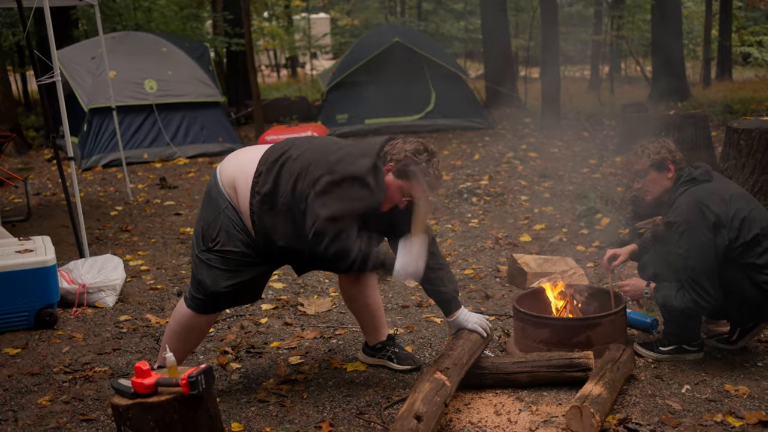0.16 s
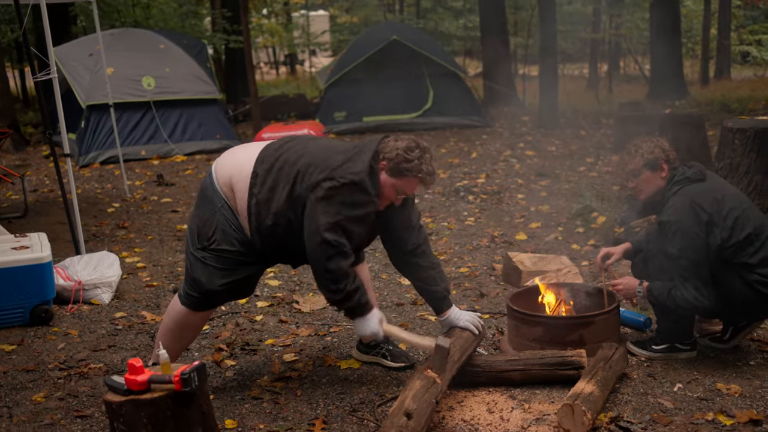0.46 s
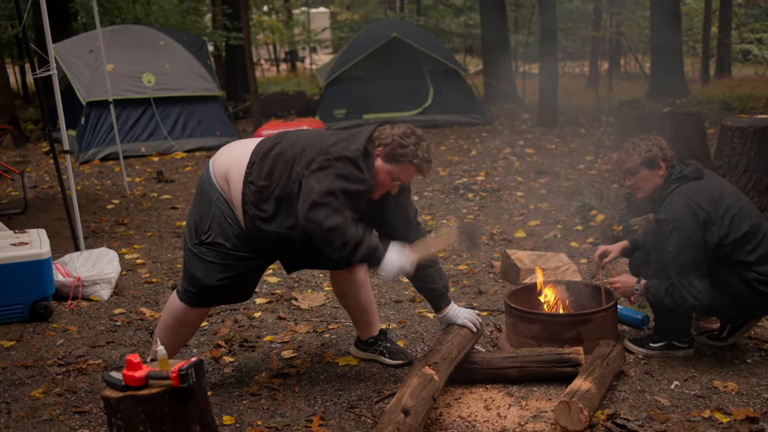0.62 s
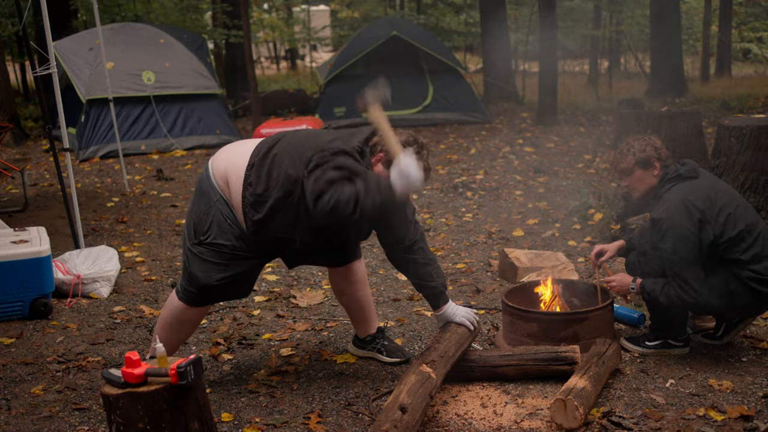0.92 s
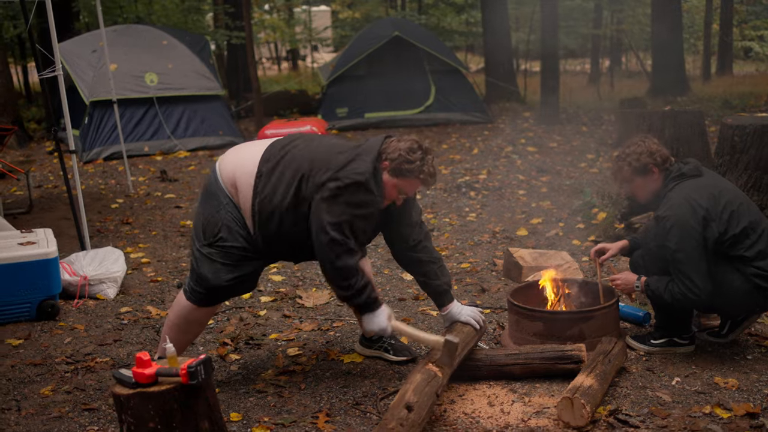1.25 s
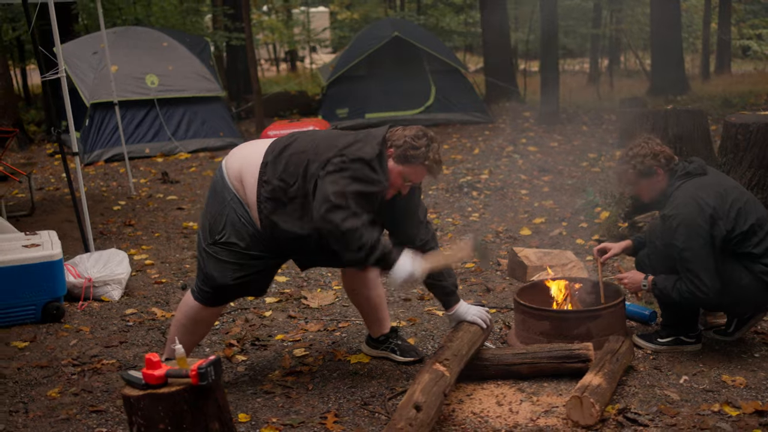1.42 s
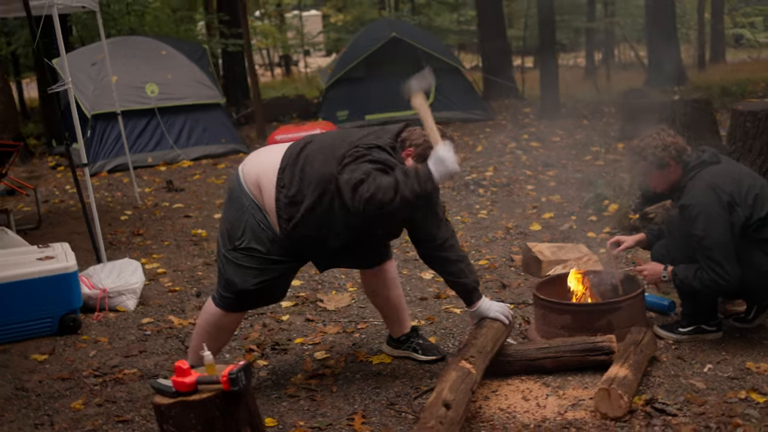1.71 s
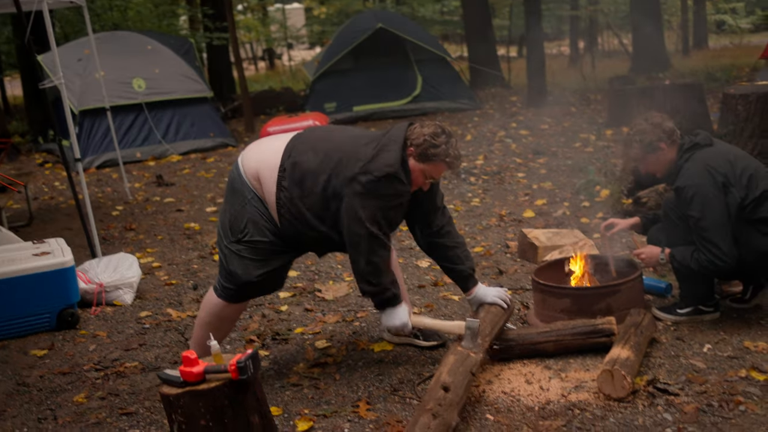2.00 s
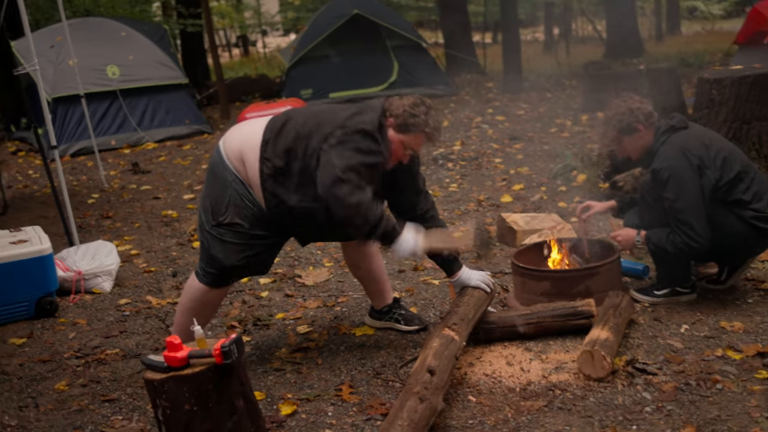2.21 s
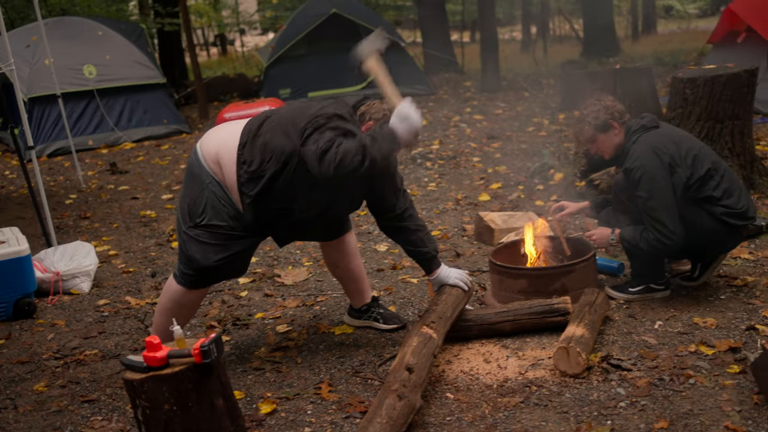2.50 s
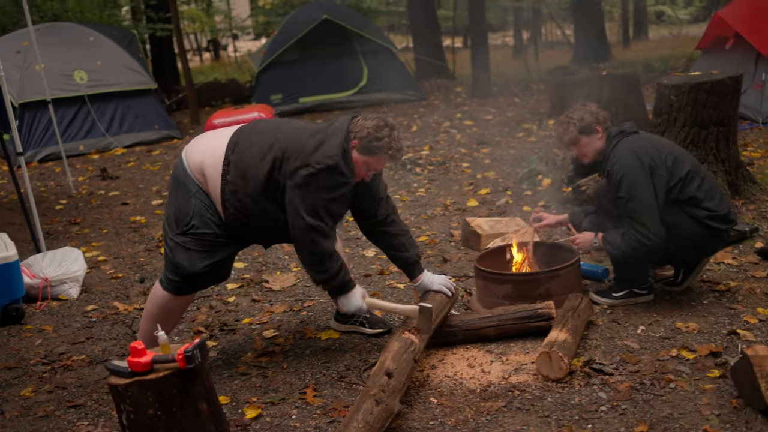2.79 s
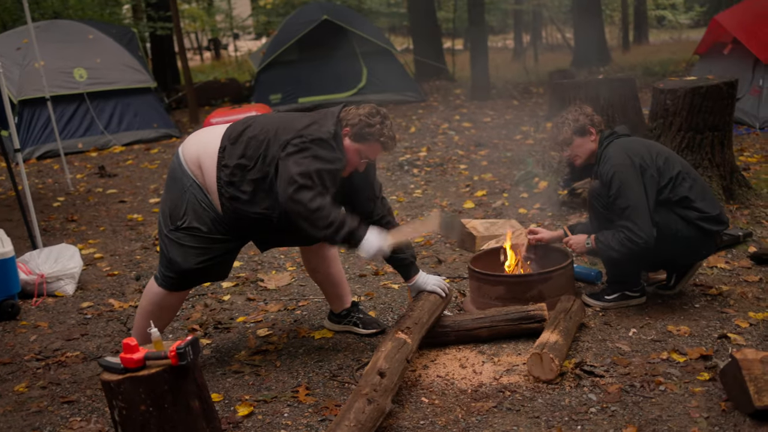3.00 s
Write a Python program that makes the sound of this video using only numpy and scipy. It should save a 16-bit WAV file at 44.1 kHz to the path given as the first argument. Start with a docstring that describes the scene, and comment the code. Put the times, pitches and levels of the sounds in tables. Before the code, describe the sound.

Four loud hatchet strikes bite into a log at a forest campsite, close enough to overload the microphone. Each woody crack leaves a short echo, with faint fire crackle, light scuffs and a low rumble in the gaps.

```python
"""At a forest campsite a hatchet chops four times into a log that lies on the ground.
Each impact gives a crack of fibres, a squeak of wedging steel, a hollow knock from the log's damped
modes and a thud. The trees scatter the sound back, and the close blows overload the microphone.
Between blows the wood scuffs and a campfire ticks over a low rumble and a thin hiss."""
import sys
import numpy as np
from scipy import signal
from scipy.fft import rfft, irfft
from scipy.io import wavfile
from scipy.ndimage import uniform_filter1d

SR = 44100
rng = np.random.default_rng(int(sys.argv[2]) if len(sys.argv) > 2 else 0)


def pcm_store(signal):
    """Save signal as 16-bit PCM."""
    levels = np.round(np.clip(np.atleast_2d(signal), -1, 1) * 32767)
    wavfile.write(sys.argv[1], SR, levels.astype(np.int16).T)


N = 138915
TIME = np.arange(N) / SR


def from_db(db):
    """Amplitude ratio of a level in decibels."""
    return 10 ** (np.asarray(db) / 20)


def at_hz(points, hz):
    """Interpolation of a spectrum on a log-frequency axis."""
    f, value = np.transpose(points)
    return np.interp(np.log(hz + 1), np.log(f), value)


def noise(gain_at, size=N):
    """Spectral shaping: white noise weighted by a gain at each frequency; unit rms."""
    x = irfft(rfft(rng.standard_normal(size)) * gain_at(np.fft.rfftfreq(size, 1 / SR)), size)
    return x / (x.std() + 1e-12)


def coloured(points):
    """Coloured noise with a tabled spectrum; unit rms."""
    return noise(lambda f: from_db(at_hz(points, f)))


def burst(hz, octaves, decay_s, size=8192):
    """Exponential decay of a band of noise around one frequency."""
    band = noise(lambda f: np.exp(-.5 * (np.log2((f + 1) / hz) / octaves) ** 2), size)
    return band * np.exp(-TIME[:size] / decay_s)


def drift(hz, size=N):
    """Random fluctuation: low-passed noise of unit rms."""
    return noise(lambda f: 1 / (1 + (f / hz) ** 2), size)


def ring(t, hz, t60):
    """Damped oscillation: a sine that falls 60 dB in t60 seconds."""
    return np.sin(2 * np.pi * hz * t) * 1000 ** (-t / t60)


def rise(t, tau_s):
    """Exponential approach to full amplitude."""
    return 1 - np.exp(-t / tau_s)


def add(out, start_s, x):
    """Superposition of a sound from a given time on."""
    i = max(int(start_s * SR), 0)
    out[i:i + len(x)] += x[:max(N - i, 0)]


def minimum_phase(gain):
    """Minimum phase: the shortest causal click that has this magnitude spectrum."""
    cepstrum = irfft(np.log(gain + 1e-7))
    half = len(cepstrum) // 2
    cepstrum[1:half] *= 2
    cepstrum[half + 1:] = 0
    return irfft(np.exp(rfft(cepstrum)))


def snap(envelope):
    """Spectral whitening: a brief noise with a fairly even spectrum and unit energy."""
    x = rng.standard_normal(len(envelope)) * envelope
    for _ in range(3):
        x = irfft(np.exp(1j * np.angle(rfft(x)))) * envelope ** .25
    return x / np.linalg.norm(x)


def forest_air():
    """Broadband noise that flickers softly, with a thin narrow-band hiss."""
    # spectrum of the air: f/Hz, relative level/dB
    spectrum = [(76, -38.5), (130, -7.5), (315, -9), (394, -11.5), (532, -5.5), (638, -11.5), (917, -13),
                (1170, -9), (1400, -16), (2140, -18), (2510, -17), (4320, -20.5), (5290, -25),
                (7910, -27.5), (16000, -36.5)]
    air = from_db(-61 + 1.5 * drift(hz=6)) * coloured(spectrum)
    hiss = from_db(-68.5) * burst(hz=4280, octaves=.06, decay_s=np.inf, size=N)
    return air + hiss


def rumble():
    """Amplitude modulation: low-frequency noise slowly rises and falls."""
    # envelope of the rumble: t/s, relative level/dB
    envelope = [(0, -58), (.16, -42), (.30, -41.5), (.42, -36), (.46, -57), (.62, -67), (.72, -52),
                (.96, -45.5), (1.3, -41.5), (1.52, -55.5), (1.63, -39), (1.9, -49.5), (2.1, -45.5),
                (2.45, -50.5), (2.68, -52.5), (2.97, -40), (3.15, -58)]
    # its spectrum: f/Hz, relative level/dB
    spectrum = [(20, -9), (50, -1), (80, 2.5), (105, -6.5), (150, -14), (300, -21.5), (600, -57.5)]
    level_db = -7.5 + np.interp(TIME, *np.transpose(envelope)) + 1.2 * drift(hz=4.5)
    return from_db(level_db) * coloured(spectrum)


def fire():
    """Impulsive noise: a few clear ticks among many faint crackles at random times."""
    # ticks of the fire: t/s, level/dB, f/Hz
    ticks = [(.109, -54, 4000), (0.491, -45.5, 11000), (.529, -47.5, 11000), (.632, -53, 7000),
             (.937, -46, 4000), (1.234, -46.5, 12000), (1.457, -42.5, 2620), (2.114, -41, 9000),
             (2.473, -53.5, 4500), (2.551, -47.5, 2520), (2.617, -45, 3010), (2.937, -47, 6000),
             (3.059, -52, 9000)]
    tick_s, octaves, crackles_per_s = 0.0028, 0.67, 37
    out = np.zeros(N)
    for start_s, db, hz in ticks:
        add(out, start_s, from_db(db) * burst(hz, octaves, tick_s))
    for start_s, extra_db, octave in rng.random((200, 3)) * [200 / crackles_per_s, 14, 2.5]:
        if start_s < N / SR:
            crackle = burst(2000 * 2 ** octave, octaves, tick_s / 2, size=512)
            add(out, start_s, from_db(-69.5 + extra_db) * crackle)
    return out


def diffuse_echoes(bands):
    """Reverberant decay: one second of noise, each band dying at its own rate."""
    centres_hz, f = [row[0] for row in bands], np.fft.rfftfreq(SR, 1 / SR)
    white, out = rfft(rng.standard_normal(SR)) / np.sqrt(SR), 0
    for share, (_, db, t60) in zip(np.eye(len(bands)), bands):
        band = irfft(white * at_hz(list(zip(centres_hz, share)), f), SR)
        out = out + band * from_db(db - 60 * TIME[:SR] / t60)
    return out


def forest(x):
    """Scattering: near reflections, two smeared echoes and a long wash from the trunks."""
    # scatter from the trees: f/Hz, initial level/dB, T60/s
    trees = [(78.9, -10.5, 0.28), (250, -12, 0.23), (500, -11.5, 1), (1100, -11.5, 1.0), (2380, -5, 1),
             (3350, -3, 0.99), (3800, -5, 0.96), (4400, 0, 1.0), (4720, -5, 0.67), (7240, -2, 0.99),
             (10000, 1, .65), (15000, -2, 1)]
    # scatter from the ground and camp gear: f/Hz, initial level/dB, T60/s
    nearby = [(80, 3, 0.37), (244, 6, 0.19), (487, 1.5, 0.18), (1080, 5, .2), (2500, 2, 0.26),
              (6000, -2.5, .15), (15000, -0.5, .14)]
    # distinct echoes: delay t/s, level/dB, lower edge f/Hz, upper edge f/Hz
    echoes = [(0.043, -20.5, 401, 1263), (0.081, -19.5, 4500, 14000)]
    t, smear_s = TIME[:SR], .012
    response = diffuse_echoes(trees) * rise(t, 0.015) + diffuse_echoes(nearby) * rise(t, 0.0017)
    for delay_s, db, low_hz, high_hz in echoes:
        smear = rng.standard_normal(SR) * (t > delay_s) * np.exp(-abs(t - delay_s) / smear_s)
        band = signal.butter(2, [low_hz, high_hz], "band", fs=SR, output="sos")
        response += from_db(db) * signal.sosfilt(band, smear / np.linalg.norm(smear))
    return signal.fftconvolve(x, response)[:N]


def swell():
    """Noise under an envelope: a hiss swells just before the first blow."""
    # envelope of the hiss: t/s, level/dB
    envelope = [(.10, -85), (.19, -51.5), (.245, -39), (.29, -42.5), (.31, -61)]
    # its spectrum: f/Hz, relative level/dB
    spectrum = [(100, -6.5), (480, -9.5), (800, -21), (1250, -15), (2000, -26), (2700, -17.5), (7000, -35),
                (9300, -24), (11500, -31), (14000, -14), (16000, -20.5)]
    level_db = np.interp(TIME, *np.transpose(envelope), left=-np.inf, right=-np.inf)
    return from_db(level_db) * coloured(spectrum)


def chops(size=16384):
    """Impact excitation: the edge presses in, fibres crack, the log rings and thuds on the ground."""
    # blows: t/s, log ring gain/dB, log pitch ratio, low-mode gain/dB, knock f/Hz, knock level/dB,
    # upper knock level/dB, crack level/dB, splinters re crack/dB, squeak f/Hz, squeak bandwidth/Hz,
    # squeak level/dB, overtones re squeak/dB, thud level/dB, forest gain/dB
    blows = [(0.2930, 0, 1.0, 0, 1134, 1.5, -11, 10, -8.5, 4825, 1416, 21, -18, -15, 1.5),
             (1.1224, -4, 1, 9, 957, 5.5, -4, 8.5, -2, 4150, 1220, 8.5, -9.5, -14.5, -1.5),
             (1.949, -3.5, 1.07, -7, 1140, -9.5, -18, 9.5, -5.5, 4250, 950, 26, -0.5, -16, 2),
             (2.7396, -0.5, 1.01, 0, 1078, 4.5, -1.5, 10, -4.5, 4030, 1400, 17, -13, -15.5, -3)]
    out, t = np.zeros(N), TIME[:size]
    lead, press_s = SR // 100, 0.00082
    squeak_delay_s, thud_delay_s = 0.00072, 0.0044
    before = t[:lead] - t[lead]
    press = from_db(-4) * np.exp(before / press_s)
    for (start_s, log_db, pitch, low_db, knock_hz, knock_db, upper_db, crack_db, splinter_db,
         squeak_hz, width_hz, squeak_db, overtones_db, thud_db, forest_db) in blows:
        log = log_ring(t, log_db, pitch, low_db)
        body = (knock(t, knock_hz, knock_db, upper_db) + log) * rise(t, 0.00043)
        crack = from_db(crack_db) * fibre_crack(t, splinter_db)
        steel, overtones = from_db(squeak_db) * np.array(squeak(t, squeak_hz, width_hz, overtones_db))
        thud = from_db(thud_db) * ring(t, hz=77, t60=0.1) * rise(t, 0.031)
        radiated = all_directions([body, crack, from_db(0.5) * steel, from_db(-13) * overtones])
        add(out, start_s - lead / SR, press * np.sin(2 * np.pi * knock_hz * before))
        add(out, start_s, body + crack)
        add(out, start_s + squeak_delay_s, steel + overtones)
        add(out, start_s + thud_delay_s, thud)
        add(out, start_s, from_db(forest_db) * forest(radiated))
    return out


def log_ring(t, gain_db, pitch, low_db):
    """Free vibration: the log's normal modes, each excited to a partly random level."""
    # modes of the log: f/Hz, relative level/dB, T60/s
    modes = [(115, -32.5, .14), (206, -32, 0.098), (280, -24.5, 0.053), (346, -18, 0.065),
             (436.3, -8.5, .07), (491.4, -7, 0.059), (526, -13.5, 0.055), (598, -17.5, 0.099),
             (795, -14.5, .04), (955, -19, 0.033), (1226, -18, 0.081), (1750, -27, 0.024),
             (2550, -26.5, .015)]
    low_below_hz, spread_db = 400, 4
    out = 0
    for hz, db, t60 in modes:
        level_db = gain_db + db + low_db * (hz < low_below_hz) + spread_db * rng.normal()
        out = out + from_db(level_db) * ring(t, pitch * hz, t60)
    return out


def knock(t, hz, db, upper_db, t60=0.013):
    """Heavy damping: two inharmonic modes die fast enough to be heard as a hollow knock."""
    return from_db(db) * ring(t, hz, t60) + from_db(upper_db) * ring(t, 1.58 * hz, t60)


def fibre_crack(t, splinter_db):
    """Fracture: the fibres snap, then splinter in an uneven, dying crunch."""
    # spectrum of the crack: f/Hz, relative level/dB
    spectrum = [(150, -6), (700, 10), (1500, 9), (2300, 6), (3000, 4.5), (3800, 4.5), (5500, 0),
                (8000, -6.5), (12000, -11), (16000, -12)]
    snap_s, splinter_s, size = 0.00086, 0.0093, len(t)
    fracture = snap(np.exp(-t / snap_s))
    splinters = rng.standard_normal(size) * from_db(3 * drift(900, size)) * np.exp(-t / splinter_s)
    fracture += from_db(splinter_db) * splinters / np.linalg.norm(splinters)
    fibres = minimum_phase(from_db(at_hz(spectrum, np.fft.rfftfreq(size, 1 / SR))))
    return signal.fftconvolve(fracture, fibres)[:size]


def squeak(t, hz, width_hz, overtones_db, slip_s=0.00077):
    """Friction: steel slips through wood; returns a rough tone and, apart, its overtones."""
    # overtones of the squeak: frequency ratio, relative level/dB
    overtones = [(2.17, -4), (3.22, -5)]
    slip = snap(np.exp(-t / slip_s))

    def band(centre_hz):
        edges = [centre_hz - width_hz / 2, centre_hz + width_hz / 2]
        return signal.sosfilt(signal.butter(2, edges, "band", fs=SR, output="sos"), slip)
    return band(hz), sum(from_db(overtones_db + db) * band(ratio * hz) for ratio, db in overtones)


def all_directions(parts, smear_octaves=.22):
    """Incoherent summation: a blow as the trees receive it, its fine peaks and notches averaged out."""
    f = np.fft.rfftfreq(len(parts[0]), 1 / SR)
    grid = np.geomspace(20, SR / 2, 4000)
    width = int(smear_octaves / np.log2(grid[1] / grid[0]))
    power = sum(abs(rfft(x)) ** 2 for x in parts)
    smoothed = uniform_filter1d(np.interp(grid, f, power), width)
    return minimum_phase(np.sqrt(abs(np.interp(f, grid, smoothed))))


def scuffs():
    """Sliding friction: short dull scrapes, among them the blade being pulled out of the cut."""
    # short scrapes of wood and steel: t/s, level/dB, decay time/s, f/Hz
    scrapes = [(0.727, -45, 0.0043, 1210), (0.876, -48, 0.0066, 1167), (.885, -51, .03, 244),
               (1.457, -50, 0.015, 1050), (2.196, -37.5, 0.0067, 1100), (2.215, -41.5, 0.022, 1110),
               (2.236, -42, 0.01, 1070), (2.565, -41, .014, 1280), (2.578, -38, 0.0055, 1700)]
    out = np.zeros(N)
    for start_s, db, decay_s, hz in scrapes:
        scrape = burst(hz, octaves=.45, decay_s=decay_s)
        add(out, start_s, from_db(db) * scrape * rise(TIME[:len(scrape)], .001))
    return out


def scene():
    """Superposition of the blows, the small camp sounds with their echoes, and the background."""
    camp = fire() + scuffs()
    return (chops() + camp + forest(camp) + forest_air() + rumble() + swell())[None]


def record(dry):
    """Overload: the peaks of the blows are clipped, then a steep low-pass cuts the top."""
    cutoff_hz = 16000
    low_pass = signal.ellip(10, .1, 70, cutoff_hz, fs=SR, output="sos")
    return signal.sosfilt(low_pass, np.clip(dry, -.96, .96))


dry = scene()
out = record(dry)
pcm_store(out)
```